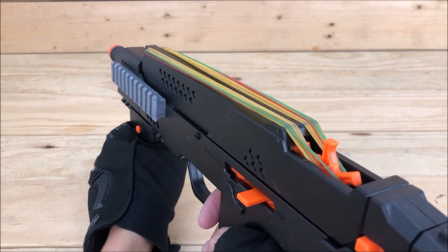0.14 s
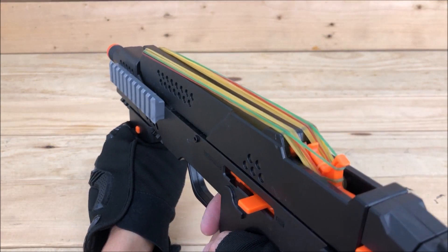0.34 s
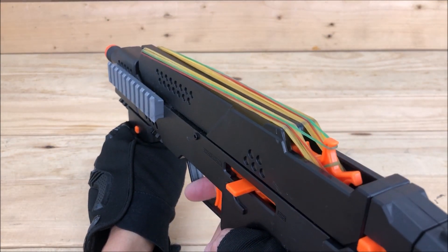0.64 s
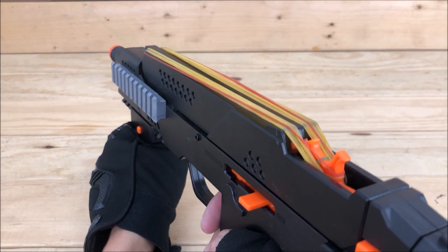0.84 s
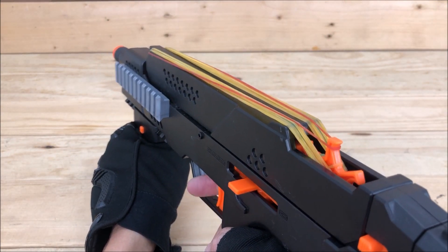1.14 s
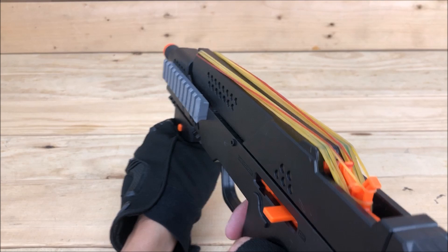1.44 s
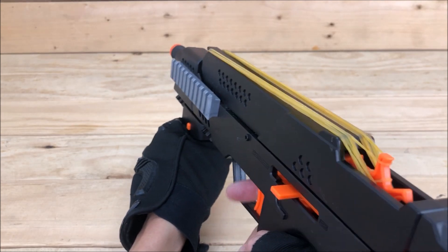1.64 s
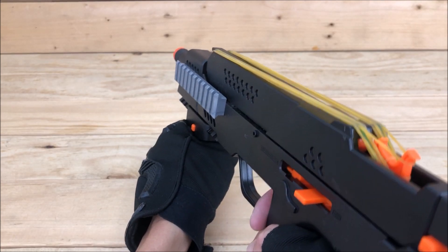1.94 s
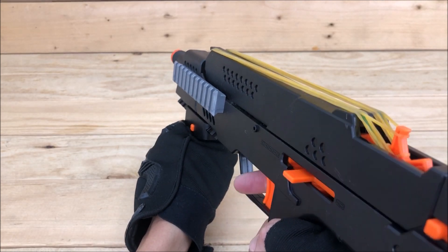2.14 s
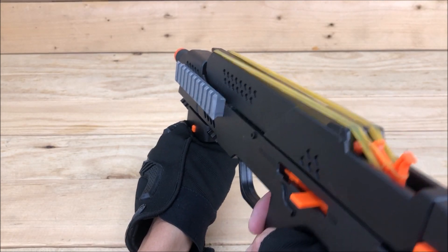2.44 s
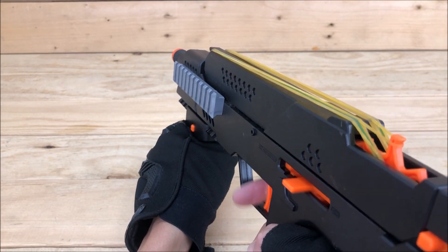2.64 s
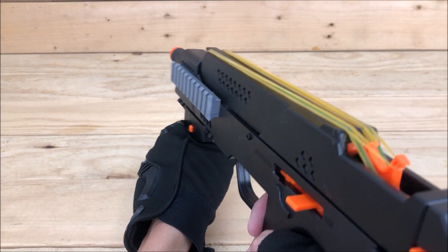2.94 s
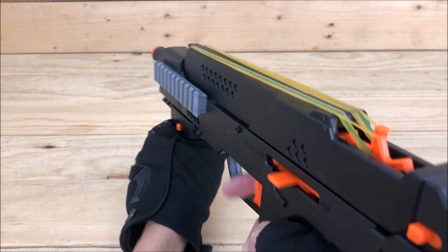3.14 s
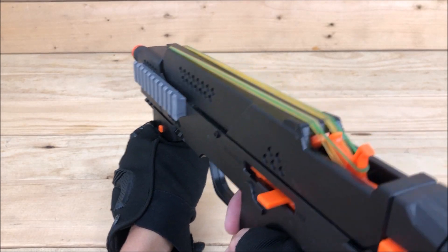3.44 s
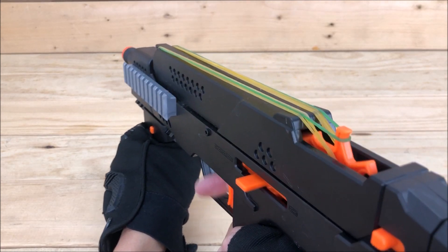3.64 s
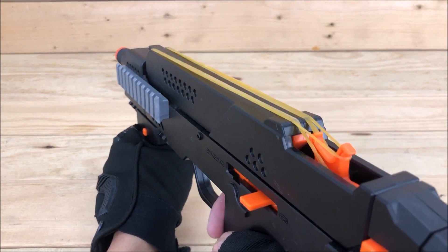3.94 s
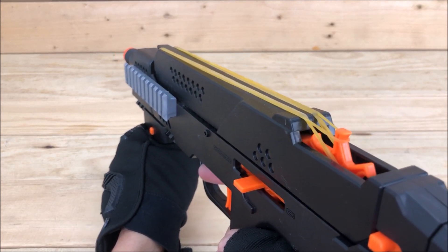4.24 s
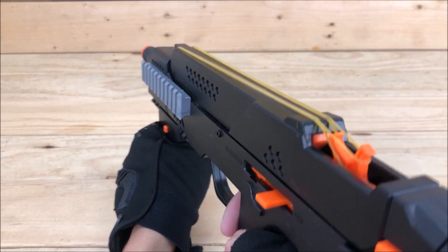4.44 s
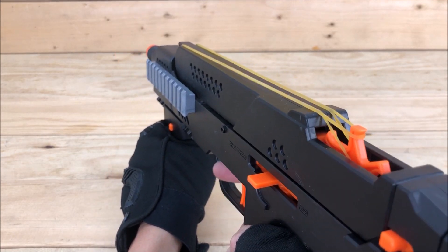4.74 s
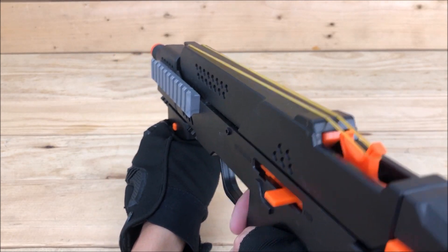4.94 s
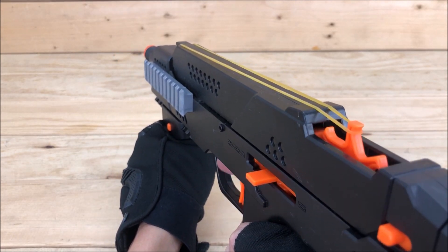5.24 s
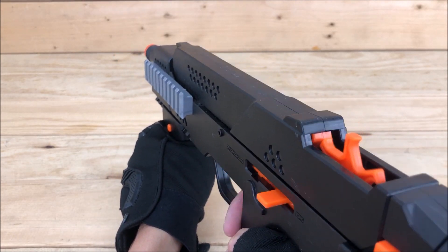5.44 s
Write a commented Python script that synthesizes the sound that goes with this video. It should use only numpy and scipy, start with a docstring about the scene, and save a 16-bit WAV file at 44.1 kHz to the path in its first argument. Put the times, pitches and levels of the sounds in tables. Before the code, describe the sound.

Close, sharp plastic snaps and clicks come about twice a second as a toy gun shoots rubber bands in a small, hard room.

```python
"""A small hard room, a faint hum, and a plastic toy gun close to the microphone.
A finger ticks on the trigger, then the gun fires eleven rubber bands. Each pull creaks, trips a pawl
and lets the toothed wheel snap round. The trigger springs back and the pawl seats again, which sets
a spring ringing; further off, the band thuds into a hollow target. As the bands run out the squeezes
get quicker and firmer, and the loose wheel knocks after seating."""
import sys
import numpy as np
from scipy import signal
from scipy.fft import rfft, irfft
from scipy.io import wavfile
from scipy.ndimage import uniform_filter1d

SR = 44100
rng = np.random.default_rng(int(sys.argv[2]) if len(sys.argv) > 2 else 0)


def to_wav(sig):
    """Store sig (one row per channel, or 1-D mono) as 16-bit WAV at the path in sys.argv[1].

    Samples outside -1..1 are clipped; the rate is SR.
    """
    pcm = np.clip(np.atleast_2d(sig), -1, 1) * 32767
    pcm = np.round(pcm).astype(np.int16)
    wavfile.write(sys.argv[1], SR, pcm.T)  # frames by channels


N = 246959


def amp(db):
    """Decibels to gain."""
    return 10 ** (np.asarray(db) / 20)


def unit(x):
    """Scales to energy 1."""
    return x / np.sqrt(np.sum(x ** 2) + 1e-20)


def blow(x, db):
    """Gives a sound the energy of 10 ms at this level."""
    return unit(x) * amp(db) * np.sqrt(SR / 100)


def read(points, hz, column=1):
    """Reads a column of a table on a log-frequency axis."""
    points = np.array(points, float)
    return np.interp(np.log(hz + 1), np.log(points[:, 0] + 1), points[:, column])


def bump(hz, centre_hz, width_hz):
    """The shape of one resonance, 1 at its centre."""
    return 1 / (1 + (2 * (hz - centre_hz) / width_hz) ** 2)


def add(mix, s, sound):
    """Mixes a sound in at time s."""
    part = mix[max(round(s * SR), 0):][:len(sound)]
    part += sound[:len(part)]


def coloured(x, gain_db):
    """Causal filter with the given gain on the bins of x."""
    log_gain = np.log(amp(np.r_[gain_db, gain_db[-2:0:-1]]))
    minimum_phase = np.exp(np.conj(signal.hilbert(log_gain)))
    return irfft(rfft(x) * minimum_phase[:len(gain_db)])


def chatter(envelope):
    """Dense random contacts under an envelope, with a fairly even spectrum."""
    burst = rng.standard_normal(len(envelope)) * envelope
    white = irfft(np.exp(1j * np.angle(rfft(burst))))
    local_rms = np.sqrt(abs(uniform_filter1d(white ** 2, size=60)) + 1e-14)
    return white * envelope / local_rms


def ringing(modes, count, detune):
    """Dying sines, one a mode, each a little off its pitch."""
    t, out = np.arange(count) / SR, np.zeros(count)
    for hz, db, t60 in modes:
        pitch_hz = hz * (1 + detune * rng.standard_normal())
        out += amp(db - 60 * t / t60) * np.sin(2 * np.pi * pitch_hz * t)
    return out


# The hush of the room: frequency_hz, gain_db
ROOM_HUSH = [(25, -14), (50, 7), (120, 1.5), (250, -0.5), (450, -11), (900, -9.5), (2000, -20.5),
             (5000, -28.5), (10000, -35.5), (15500, -44)]
# Hum and whine in the room: pitch_hz, relative_db
HUM_TONES = [(44, -74), (86.5, -75), (135, -73.5), (156, -88), (226.3, -70.5), (910, -82), (2024, -83.5)]
# Both drop at the first shot, then creep back up: time_s, gain_db
ROOM_TONE_CURVE = [(0, 7.5), (.372, 9), (.39, -3.5), (1.5, 0), (3, 2), (5.6, 5)]

def room_tone(air_db, waver):
    """A faint wavering hum and a thin whine over the hush of the room."""
    t, hz = np.arange(N) / SR, np.fft.rfftfreq(N, 1 / SR)
    air = irfft(rfft(rng.standard_normal(N)) * amp(read(ROOM_HUSH, hz)), N)
    bed = amp(air_db) * unit(air) * np.sqrt(N)
    knots = np.linspace(0, t[-1], num=40)
    for pitch_hz, db in HUM_TONES:
        drift = waver * np.interp(t, knots, rng.standard_normal(len(knots)))
        bed += amp(db) * np.sqrt(2) * np.sin(2 * np.pi * pitch_hz * t + drift)
    return bed * amp(np.interp(t, *np.transpose(ROOM_TONE_CURVE)))


# The hollow gun colours what it sends to the walls: centre_hz, width_hz, gain_db
GUN_CAVITY = [(920, 61, -1.5), (1280, 250, 2), (1702, 150, 7.5), (2000, 92, 1), (2530, 220, 4.5),
              (3330, 320, -3.5), (3790, 150, 1), (4650, 200, -3.5)]
# The tail off the hard walls: frequency_hz, gain_db, t60_s
WALL_DECAY = [(151, 8.5, 0.92), (292, 4, 0.38), (660, 4.5, 0.74), (1150, 4, 0.41), (1640, 0.5, 0.64),
              (2680, -0.5, 0.51), (2980, -2.5, 0.53), (5000, -0.5, 0.52), (6750, 0, 0.49), (9800, -4, .39),
              (15400, 0.5, 0.32)]

def wall_echoes(x, delay_s, build_s, early_db, early_s):
    """The walls answer after a short gap: strong early echoes, then a tail that dies by band."""
    t, bins_hz = np.arange(SR) / SR, np.fft.rfftfreq(SR, 1 / SR)
    cavity = amp(sum(db * bump(bins_hz, f, width) for f, width, db in GUN_CAVITY))
    onset = (1 - np.exp(-t / build_s)) * (1 + amp(early_db) * np.exp(-t / early_s))
    out, places, cycle_s = np.zeros(N), 4, 1.3
    for place in range(places):
        # the echo pattern keeps changing slowly, so no tone stands steady in the tail
        share = np.maximum(np.cos(2 * np.pi * (np.arange(N) / SR / cycle_s + place / places)), 0)
        noise = irfft(rfft(rng.standard_normal(SR)) * cavity)
        hz, frame_s, bands = signal.stft(noise, SR, nperseg=256)
        t60 = read(WALL_DECAY, hz, column=2)[:, None]
        bands = bands * amp(read(WALL_DECAY, hz)[:, None] - 60 * frame_s / t60)
        tail = signal.istft(bands, SR, nperseg=256)[1][:SR]
        add(out, delay_s, signal.fftconvolve(x * share, unit(tail * onset)))
    return out


# The hollow target, further from the microphone: pitch_hz, relative_db, t60_s
TARGET_MODES = [(158.4, -15, 0.26), (251.3, -21, 0.54), (285.4, -2, 0.069), (324.6, 7.5, 0.039),
                (376.3, -1, 0.099), (495, -16.5, 0.22), (690, -15.5, 0.1), (770, -7.5, 0.084),
                (923, -10, 0.15), (1338, -7, 0.064), (1530, -15.5, 0.26), (1856, -1.5, 0.089)]
# Rubber slapping on it: frequency_hz, gain_db
SLAP_SPECTRUM = [(100, -37), (205, -28), (290, -0.5), (420, 6), (600, 2.5), (1400, 2.5), (2600, -0.5),
                 (3400, -2.5), (4700, -1.5), (7000, 0), (11000, -9), (15500, -23)]
# A band lands or bounces: start_s, thud_db, slap_db
BAND_HITS = [(0.96, -35, -54), (1.689, -34, -30.5), (1.976, -39, -47), (2.524, -29.5, -26.5),
             (3.086, -32, -29.5), (3.509, -28.5, -23.5), (3.978, -37, -33), (4.548, -31, -32.5),
             (5.032, -31, -30), (5.499, -31, -26)]

def target(rise_s, slap_s):
    """The band slaps and tumbles on the target, which booms briefly."""
    size = 8192
    t, hz = np.arange(size) / SR, np.fft.rfftfreq(size, 1 / SR)
    swell, out = 1 - np.exp(-t / rise_s), np.zeros(N)
    for s, thud_db, slap_db in BAND_HITS:
        thud = swell * ringing(TARGET_MODES, count=size, detune=0.03)
        slap = coloured(chatter(swell * np.exp(-t / slap_s)), read(SLAP_SPECTRUM, hz))
        add(out, s, blow(thud, thud_db) + blow(slap, slap_db))
    # the target gives no deep bass
    return signal.sosfilt(signal.butter(4, 190, "highpass", fs=SR, output="sos"), out)


# The return spring inside the gun: pitch_hz, relative_db, t60_s
SPRING_MODES = [(1356, -20, 0.42), (1720, -15, 0.53), (1780, -13, 0.38), (3700, -20, .35), (4500, -8, .4),
                (4400, -4, .5), (4500, -22, 0.52), (4770, 5, 0.36)]
# The finger lets go between shots: start_s, wait_for_pawl_s, return_db, seat_db
TRIGGER_RELEASES = [(.559, .011, -33, -25), (1.081, 0.017, -28.5, -22), (1.655, .0162, -28.5, -24),
                    (2.1106, .0242, -28.5, -23.5), (2.6701, 0.029, -28, -24), (3.17, .023, -25.5, -21.5),
                    (3.6572, .0275, -23.5, -21.5), (4.107, .028, -23.5, -21), (4.678, 0.025, -24, -22.5),
                    (5.169, 0.025, -22, -21.5)]

def spring(level_db, return_db):
    """The spring rings when the trigger comes back and again when the pawl seats."""
    out = np.zeros(N)
    for s, wait, _, _ in TRIGGER_RELEASES:
        for at, db in ((s, return_db), (s + wait, 0)):
            add(out, at, blow(ringing(SPRING_MODES, count=SR // 2, detune=0.00087), db + level_db))
    return out


def emptiness(s):
    """How far the gun has emptied: 0 at the start, 1 at the end."""
    return s * SR / N


# Peaks and dips of the shell, struck at the trigger: centre_hz, width_hz, gain_db
SHELL_AT_TRIGGER = [(544, 94, 8), (734, 295, -5.5), (892, 78, 5), (1200, 280, 2), (1520, 120, 2),
                    (1760, 160, -1), (2190, 130, 2), (2630, 390, 1.5), (3440, 380, 0.5), (4250, 440, -1.5),
                    (4480, 420, 2.5), (5500, 150, -1), (5960, 370, 0), (7670, 360, 0.5), (8030, 250, -4)]

def clicks(rows, colour, contact_s, knock_db, knock_rise_db, fizz_db,
           ring_hz, ring_glide, ring_db, ring_width_hz,
           rise_s, rattle_db, rattle_s, slide_db, patchy_db, send_db, modes=SHELL_AT_TRIGGER):
    """Plastic slides, strikes and rattles at each (start_s, level_db). Gives close sound and room send."""
    size, lead_s = 2048, .002
    t, hz = np.arange(size) / SR - lead_s, np.fft.rfftfreq(size, 1 / SR)
    after = np.maximum(t, 0)
    low, high = 1 / (1 + (hz / 2300) ** 4), 1 - 1 / (1 + (hz / 6500) ** 6)
    resonances_db = sum(db * bump(hz, f, width) for f, width, db in modes)
    bass_cut_db = 12 / (1 + (hz / 130) ** 4)
    shell_db = read(colour, hz) + resonances_db - bass_cut_db
    slide = amp(slide_db) * np.exp(-abs(t) / 0.00059)
    contact = np.exp(-.5 * (after / contact_s) ** 1.26)
    rattle = amp(rattle_db) * np.exp(-after / rattle_s)
    envelope = slide + (1 - np.exp(-after / rise_s)) * (contact + rattle)
    out = np.zeros(N)
    for s, db in rows:
        # each blow lands a little differently and favours other resonances
        patches = np.interp(hz, hz[::6], rng.standard_normal(len(hz[::6])))
        # the ring of the part and the low knock of the shell drift as the bands come off
        ring = bump(hz, ring_hz * np.exp(ring_glide * emptiness(s)), ring_width_hz)
        knock = (knock_db + knock_rise_db * emptiness(s)) * low
        # the bands damp the action: the treble rises 1 dB as they come off
        fizz = (fizz_db + emptiness(s) - .5) * high
        shape_db = shell_db + knock + fizz + ring_db * ring + patchy_db * patches
        add(out, s - lead_s, blow(coloured(chatter(envelope), shape_db), db))
    return np.array([out, out * amp(send_db)])


# One squeeze a shot, close to the microphone: snap_s, squeeze_s, pull_db, trip_db, snap_db
SQUEEZES = [(0.376, 0.023, -54, -46, -22), (.921, .0795, -51, -31.5, -21), (1.497, 0.063, -34, -30, -21.5),
            (1.9527, 0.056, -34.5, -35.5, -21.5), (2.498, 0.052, -35, -31.5, -20.5),
            (2.988, 0.038, -30.5, -29, -20), (3.477, 0.041, -29.5, -28.5, -18),
            (3.932, .0365, -26.5, -33, -19), (4.512, .034, -27, -28.5, -19),
            (5.002, 0.033, -26, -28.5, -19.5), (5.4615, 0.028, -24, -26, -19.5)]
# The finger shifts on the trigger: start_s, level_db
FINGER_TOUCHES = [(.152, -53), (.16, -51), (.207, -53.5), (.308, -52.5), (.86, -45)]
# The tick of the loose trigger: frequency_hz, gain_db
TICK_SPECTRUM = [(200, -24), (600, -7.5), (950, -6), (1900, 5), (2500, -12), (3500, -6.5), (5000, -14.5),
                 (8000, -20), (12000, -30), (15500, -46)]

def trigger_slack(lead_s, softer_db):
    """The loose trigger ticks when touched and just before each pull."""
    ticks = [(s - squeeze - lead_s, db - softer_db) for s, squeeze, db, _, _ in SQUEEZES]
    return clicks(FINGER_TOUCHES + ticks, TICK_SPECTRUM,
                  contact_s=.0061, knock_db=-2.5, knock_rise_db=4, fizz_db=2.5,
                  ring_hz=3360, ring_glide=-.1, ring_db=11, ring_width_hz=180,
                  rise_s=.00032, rattle_db=-15, rattle_s=.013, slide_db=-29, patchy_db=5.5, send_db=-11)


# The creak of the pull, also the knock of the loose wheel: frequency_hz, gain_db
CREAK_SPECTRUM = [(200, -20.5), (600, -14.5), (950, 2), (1500, -3), (1950, -0.5), (2400, -6.5),
                  (3100, -3.5), (5400, -9.5), (7500, -8.5), (10000, -14.5), (12500, -21), (15500, -31)]

def trigger_pulls():
    """The trigger creaks as it takes up the load at the start of each squeeze."""
    rows = [(s - squeeze, db) for s, squeeze, db, _, _ in SQUEEZES]
    return clicks(rows, CREAK_SPECTRUM, contact_s=.0028, knock_db=.5, knock_rise_db=-3.5, fizz_db=3,
                  ring_hz=3030, ring_glide=.05, ring_db=2.5, ring_width_hz=150,
                  rise_s=.00051, rattle_db=-2, rattle_s=.013, slide_db=-7.5, patchy_db=4, send_db=-9)


def wheel_settles(from_s):
    """Once few bands hold it, the wheel rocks and knocks twice, softly, after the pawl seats."""
    rows = []
    for s, wait, _, db in TRIGGER_RELEASES:
        if s > from_s:
            seat_s = s + wait
            gap_s = .037 * (1 - .45 * emptiness(seat_s))  # faster as the gun empties
            rows += [(seat_s + gap_s, db - 10), (seat_s + 2 * gap_s, db - 15)]
    return clicks(rows, CREAK_SPECTRUM, contact_s=.0028, knock_db=-2, knock_rise_db=9, fizz_db=-.5,
                  ring_hz=1950, ring_glide=.39, ring_db=10, ring_width_hz=440,
                  rise_s=.00034, rattle_db=-25, rattle_s=.005, slide_db=-27, patchy_db=5.5, send_db=-26)


# The thin click of the pawl letting go: frequency_hz, gain_db
TRIP_SPECTRUM = [(200, -45), (600, -22), (950, -16.5), (1600, -4), (2500, -7.5), (3800, 1), (4600, -0.5),
                 (5500, -6), (6200, 1.5), (8300, -7.5), (9500, -14), (12800, -13), (15500, -27)]

def pawl_trips():
    """The pawl slides off its tooth in mid-squeeze."""
    rows = [(s - .51 * squeeze, db) for s, squeeze, _, db, _ in SQUEEZES]
    return clicks(rows, TRIP_SPECTRUM, contact_s=.0016, knock_db=4, knock_rise_db=7.5, fizz_db=2,
                  ring_hz=5100, ring_glide=-.28, ring_db=6, ring_width_hz=640,
                  rise_s=.00016, rattle_db=-10, rattle_s=.01, slide_db=-31, patchy_db=3, send_db=-14)


# The trigger hitting its stop: frequency_hz, gain_db
RETURN_SPECTRUM = [(200, -26.5), (600, -9), (1100, -5), (1450, 0), (2300, -6), (3000, 2.5), (3600, 6),
                   (4150, -0.5), (4550, 3), (5600, -8.5), (9000, -5), (12000, -14.5), (15500, -24)]

def trigger_returns(bounce_s, bounce_db):
    """The trigger springs back and bounces once on its stop."""
    stops = [(s, db) for s, _, db, _ in TRIGGER_RELEASES]
    bounces = [(s + bounce_s, db + bounce_db) for s, db in stops]
    return clicks(stops + bounces, RETURN_SPECTRUM,
                  contact_s=.0018, knock_db=-4.5, knock_rise_db=3.5, fizz_db=-1.5,
                  ring_hz=4660, ring_glide=0, ring_db=6.5, ring_width_hz=260, rise_s=.0002,
                  rattle_db=-13, rattle_s=.0097, slide_db=-10, patchy_db=2.5, send_db=-12.5)


# The bright click of the pawl seating: frequency_hz, gain_db
SEAT_SPECTRUM = [(200, -43), (600, -24.5), (1000, -13.5), (2100, -7), (2700, -6.5), (3400, 2), (3950, -3.5),
                 (4550, -0.5), (5500, -7), (7700, -7.5), (9200, -5), (12500, -13), (15500, -20.5)]

def pawl_seats():
    """The pawl catches the next tooth."""
    rows = [(s + wait, db) for s, wait, _, db in TRIGGER_RELEASES]
    return clicks(rows, SEAT_SPECTRUM, contact_s=.002, knock_db=.7, knock_rise_db=-2.3, fizz_db=0,
                  ring_hz=4540, ring_glide=0, ring_db=4, ring_width_hz=310,
                  rise_s=.00045, rattle_db=-12, rattle_s=.0049, slide_db=-13, patchy_db=3, send_db=-.08)


# Peaks and dips of the shell, struck at the wheel: centre_hz, width_hz, gain_db
SHELL_AT_WHEEL = [(530, 53, 12), (746, 270, -9), (1290, 1100, 2.5), (1720, 100, -5.5), (2100, 120, -4),
                  (3460, 230, -5), (3780, 170, 2), (4250, 140, -5.5), (4860, 330, 4), (5530, 250, -1.5),
                  (6370, 160, -0.5)]
# The shot itself, at close range: frequency_hz, gain_db
SNAP_SPECTRUM = [(200, -35.5), (550, -23), (800, -15), (1300, -10.5), (2000, -6), (3000, -1), (3750, 0),
                 (4200, 0), (4700, -3), (5700, -4.5), (9700, -5.5), (12500, -11), (15500, -22)]

def wheel_snaps():
    """The wheel spins to its stop and frees a band; it rings higher with fewer bands on it."""
    rows = [(s, db) for s, _, _, _, db in SQUEEZES]
    return clicks(rows, SNAP_SPECTRUM, modes=SHELL_AT_WHEEL,
                  contact_s=.0021, knock_db=1.8, knock_rise_db=2.5, fizz_db=.2,
                  ring_hz=2600, ring_glide=.653, ring_db=3, ring_width_hz=710, rise_s=.00057,
                  rattle_db=-12, rattle_s=.0045, slide_db=-9.5, patchy_db=3, send_db=-.92)


def scene():
    """One microphone: the gun close by, the target further off, the room all round."""
    close, send = (trigger_slack(lead_s=.0105, softer_db=16) + trigger_pulls() + pawl_trips()
                   + wheel_snaps() + trigger_returns(bounce_s=.0037, bounce_db=-4.5)
                   + pawl_seats() + wheel_settles(from_s=2.5))
    thuds = target(rise_s=.0076, slap_s=.007)
    echoes = wall_echoes(send + amp(-13) * thuds, delay_s=.011, build_s=.0042, early_db=5, early_s=.051)
    rings = spring(level_db=-46.5, return_db=-7)
    return (close + thuds + echoes + rings + room_tone(air_db=-69, waver=.54))[None]


def record(dry):
    """The recorder passes nothing much above 16 kHz."""
    lowpass = signal.firwin(255, 16100, window=("kaiser", 8), fs=SR)
    return signal.oaconvolve(dry, lowpass[None], "same")


dry = scene()
out = record(dry)
to_wav(out)
```